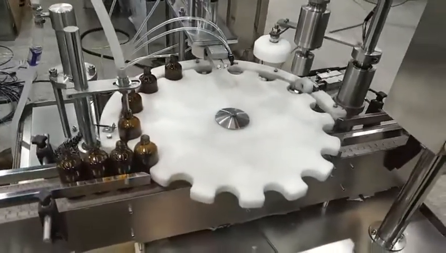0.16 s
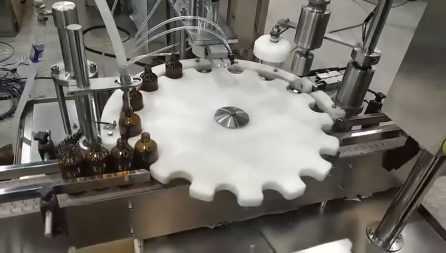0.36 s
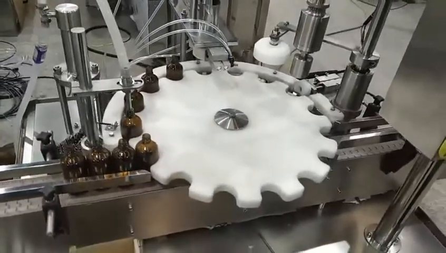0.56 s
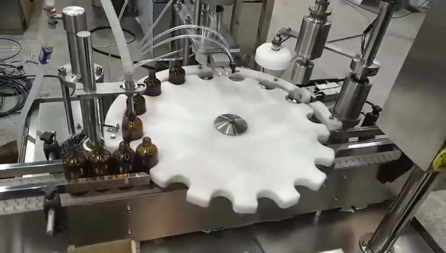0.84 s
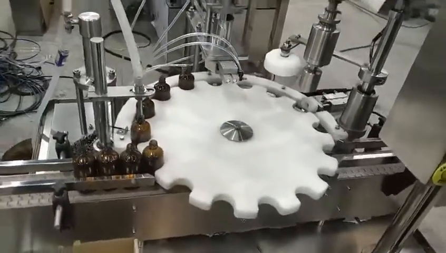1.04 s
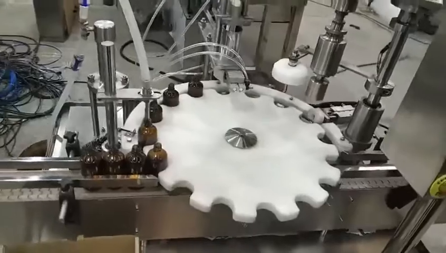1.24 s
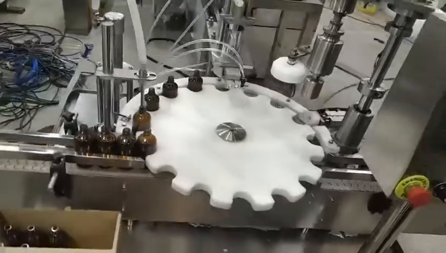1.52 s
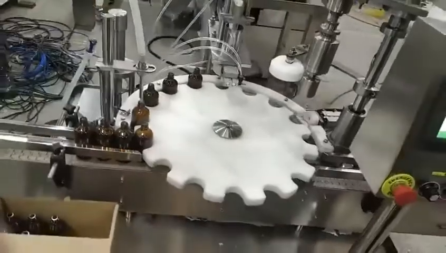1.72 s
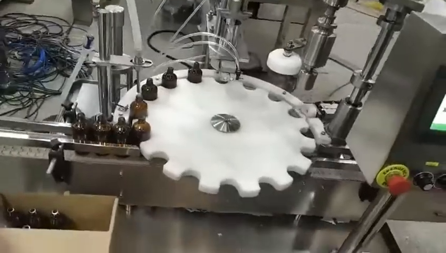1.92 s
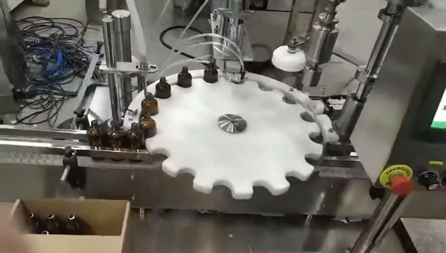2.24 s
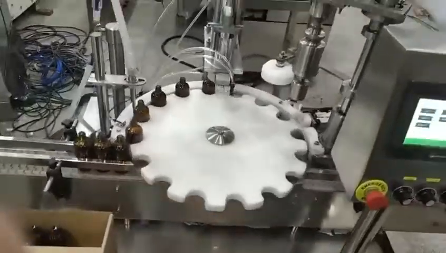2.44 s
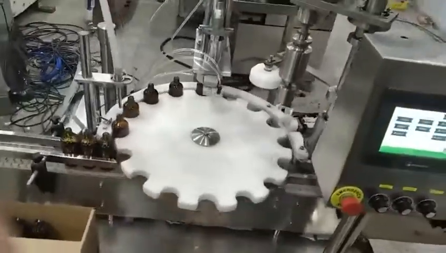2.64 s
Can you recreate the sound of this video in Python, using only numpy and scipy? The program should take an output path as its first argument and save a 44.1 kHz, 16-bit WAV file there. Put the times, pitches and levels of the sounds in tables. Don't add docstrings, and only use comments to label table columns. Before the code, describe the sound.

A bottle filling machine whirs and rattles continuously while air valves puff and glass bottles clink.

```python
import sys
import numpy as np
from scipy import signal
from scipy.fft import rfft, irfft
from scipy.io import wavfile
from scipy.ndimage import uniform_filter1d

SR = 44100
rng = np.random.default_rng(int(sys.argv[2]) if len(sys.argv) > 2 else 0)


def bounce(signal):
    frames = np.transpose(np.atleast_2d(signal))
    limited = np.clip(frames, -1, 1)
    pcm = np.round(limited * 32767).astype(np.int16)
    wavfile.write(sys.argv[1], SR, pcm)


def volts_from_db(level):
    exponent = np.asarray(level, float) / 20
    return 10 ** exponent


N = 122157
T = np.arange(N) / SR


def level(x, db):
    return x * volts_from_db(db) / np.sqrt(np.mean(x ** 2))


def band(x, hz, width_hz):
    return signal.lfilter(*signal.iirpeak(min(hz, .45 * SR), hz / width_hz, fs=SR), x)


def ring(x, hz, t60_s):
    r = np.exp(-np.log(1000) / (t60_s * SR))
    w = 2 * np.pi * hz / SR
    return signal.lfilter([0, np.sin(w)], [1, -2 * r * np.cos(w), r * r], x)


def walk(rate_hz):
    hold = int(SR / rate_hz)
    steps = np.repeat(rng.standard_normal(N // 200), hold)[:N]
    return 1.31 * uniform_filter1d(uniform_filter1d(steps, hold), hold)


def curve(x, table):
    return np.interp(x, *np.array(table).T)


def log_curve(hz, table):
    table_hz, table_db = np.array(table).T
    return np.interp(np.log(hz), np.log(table_hz), table_db)


# [f/Hz, level/dB, t60/s]
GLASS_MODES = [(7120, 5.5, 0.042), (6850, -2, .03), (7190, -8, 0.05), (7380, -9, .015)]
# [f/Hz, level/dB, t60/s]
RAIL_MODES = [(2520, -5, 0.015), (3150, 5, 0.035), (4560, 3, 0.03), (5050, 1, 0.03), (5685, 2, 0.04)]
# [t/s, glass level/dB, rail level/dB]
KNOCKS = [(0.73, -19, -27), (0.757, -28, -34), (.772, -29, -48), (2.1275, -22, -14), (2.1295, -13, -17),
          (2.142, -24, -24), (2.172, -23, -45), (2.188, -21, -35), (2.213, -8, -33), (2.2245, -12, -33.5),
          (2.237, -16, -30), (2.246, -19, -35), (2.253, -16.5, -26), (2.277, -28, -41), (2.286, -21, -39),
          (2.293, -24, -45), (2.763, -19, -25), (2.766, -13.5, -35)]
CONTACT_S = .0009
CRACK_DB, CRACK_S = 8, 0.005


def clinks():
    out, t = np.zeros(N + SR), np.arange(SR // 8) / SR
    contact = 1 - np.exp(-t / CONTACT_S)
    for start_s, glass_db, rail_db in KNOCKS:
        modes = [(hz, db + glass_db, t60) for hz, db, t60 in GLASS_MODES]
        modes += [(hz, db + rail_db - 1.5, t60) for hz, db, t60 in RAIL_MODES]
        knock = 0
        for hz, db, t60_s in modes:
            phase = 2 * np.pi * (hz * t + 0.078 * rng.random())
            knock = knock + volts_from_db(db - 60 * t / t60_s) * np.sin(phase)
        crack = band(rng.standard_normal(len(t)), 5300.0, 3700.0)
        crack = crack * volts_from_db(rail_db + CRACK_DB) * np.exp(-t / CRACK_S)
        out[int(start_s * SR):][:len(t)] += 0.81 * (knock + crack) * contact
    return out[:N]


# [t/s, length/s, level/dB rms, f/Hz, width/Hz]
BURSTS = [(.77, .06, -33, 5100, 900), (1.0, .14, -37, 7300, 1200), (1.181, .014, -25, 4900, 1300),
          (1.205, .014, -24, 5100, 900), (1.222, .04, -26, 5400, 1400), (1.27, .048, -23, 6200, 1200),
          (1.29, .034, -24.5, 7500, 1500), (1.272, .048, -22.5, 4700, 1600), (1.308, .014, -29, 3200, 800),
          (1.32, .015, -25, 5000, 1200), (1.336, .026, -24, 5000, 3000), (1.35, .008, -26, 5200, 900),
          (1.378, .025, -28, 2700, 700), (1.27, .035, -26, 350, 250), (1.55, .07, -31, 210, 70),
          (1.62, .05, -29, 390, 90), (2.25, .25, -28.5, 7800, 3600), (2.26, .07, -28, 5300, 1900),
          (2.36, .2, -33, 2450, 700), (2.72, .05, -30, 1400, 900), (.535, .03, -28, 1420, 200),
          (2.02, .08, -33, 540, 80)]
GRAIN_DB, GRAIN_HZ = 2.0, 150


def puffs():
    out = 0
    for start_s, length_s, db, hz, width_hz in BURSTS:
        swell = np.sin(np.pi * np.clip((T - start_s) / length_s, 0, 1) ** .7)
        noise = band(band(rng.standard_normal(N), hz, width_hz), hz, width_hz)
        noise = noise * volts_from_db(GRAIN_DB * walk(GRAIN_HZ))
        out = out + level(swell * noise, db) * np.sqrt(length_s * SR / N / 2)
    return out


# [order of 50 Hz, level/dB rms, partner motor re first/dB]
HUM_ORDERS = [(3, -45, -10), (4, -46, -10), (5, -37.5, -9), (6, -33, -5), (7, -38, -10), (8, -43, -7),
              (14, -46, -9)]
# [t/s, level/dB]
MOTOR_STRAIN = [(0, 0.5), (.12, 2.5), (.31, -0.5), (.49, -1), (.64, -0.5), (.83, 0), (.93, -1), (1.05, -1),
                (1.2, 1.5), (1.42, 2), (1.54, -5), (1.61, 2.5), (1.72, -5.5), (1.8, 1.5), (2.0, 0),
                (2.2, -3.5), (2.45, -1), (2.77, 1)]
MAINS_HZ = 50.0
SLIP_HZ, BEAT_PEAK_S = 5.3, 1.62
HUM_WOBBLE_DB, HUM_WOBBLE_HZ = 1.4, 14


def motors():
    out = 0
    strain_db = curve(T, MOTOR_STRAIN)
    for order, db, partner_db in HUM_ORDERS:
        turn = 2 * np.pi * (order * MAINS_HZ * T + rng.random())
        slip = 2 * np.pi * SLIP_HZ * order / 6 * (T - BEAT_PEAK_S)
        gain = np.sqrt(2) * volts_from_db(db + strain_db + HUM_WOBBLE_DB * walk(HUM_WOBBLE_HZ))
        out = out + gain * (np.sin(turn) + volts_from_db(partner_db) * np.sin(turn - slip))
    return out


# [f/Hz, width/Hz, level/dB rms]
GEAR_TONES = [(528, 14, -39.5), (701, 16, -41), (899, 8, -41), (935, 12, -46), (1037, 14, -45),
              (1206, 25, -40.5), (1388, 16, -41), (1745, 16, -42), (2500, 350, -34.5), (2902, 20, -46),
              (3280, 100, -43), (4800, 600, -37), (9308, 8, -50)]


def gears():
    return sum(level(band(rng.standard_normal(N), hz, width_hz), db) for hz, width_hz, db in GEAR_TONES)


# [f/Hz, level/dB per Hz]
MACHINE_COLOUR = [(94, -46.5), (160, -10), (301, -7), (403, -11), (720, -13), (1080, -13.5), (1500, -9),
                  (2050, -12), (2600, -11), (5000, -12.5), (7200, -17), (8800, -14), (9600, -14.5),
                  (12400, -80.5)]
FLICKER_DB, FLICKER_HZ, DRIFT_DB, DRIFT_HZ = 1.0, 12, 0.28, 3


def wash():
    out = 0
    for hz in 130 * 2 ** np.arange(0, 6.4, 1 / 3):
        noise = band(band(rng.standard_normal(N), hz, hz / 3), hz, hz / 3)
        db = log_curve(hz, MACHINE_COLOUR) + FLICKER_DB * walk(FLICKER_HZ) + DRIFT_DB * walk(DRIFT_HZ)
        out = out + volts_from_db(db) * noise
    return out


RATTLE_PER_S, RATTLE_SPREAD_DB, RATTLE_T60_S = 2500, 3.0, .09
RATTLE_LO_HZ, RATTLE_HI_HZ, RATTLE_MODES = 515.6, 8920, 90


def rattle():
    out = 0
    detune = 1 + .015 * rng.standard_normal(RATTLE_MODES)
    for hz in np.geomspace(RATTLE_LO_HZ, RATTLE_HI_HZ, RATTLE_MODES) * detune:
        struck = rng.random(N) < RATTLE_PER_S / RATTLE_MODES / SR
        size = np.minimum(rng.exponential(size=N), 2)
        hits = struck * volts_from_db(RATTLE_SPREAD_DB * size)
        grains = ring(hits, hz, RATTLE_T60_S) / np.sin(2 * np.pi * hz / SR)
        out = out + volts_from_db(log_curve(hz, MACHINE_COLOUR)) * np.sqrt(hz) * grains
    return out


# [t/s, level/dB]
MACHINE_LOAD = [(0, -3), (.2, -0.5), (.5, -1.5), (.8, -0.5), (1.1, 0), (1.4, 0), (1.55, -0.5), (1.8, -1.5),
                (2.1, -1), (2.4, -1.5), (2.6, -2), (2.77, -1.5)]
WASH_DB, RATTLE_DB = -21.5, -25


def machinery():
    return (level(wash(), WASH_DB) + level(rattle(), RATTLE_DB)) * volts_from_db(curve(T, MACHINE_LOAD))


ECHO_T60_S, ECHO_DB = .3, -13


def room(near):
    size = SR // 2
    tail = rng.standard_normal(size) * volts_from_db(-60 * np.arange(size) / SR / ECHO_T60_S)
    tail = tail / np.sqrt(np.sum(tail ** 2))
    return signal.fftconvolve(near, tail)[:N] * volts_from_db(ECHO_DB)


def scene():
    near = clinks() + puffs()
    return np.tile(near + room(near) + motors() + gears() + machinery(), (2, 1))


# [t/s, level/dB, release/s]
GAIN_DIPS = [
    (1.25, -2.5, 0.11),
    (2.131, -4.5, 0.096),
    (2.215, -2.5, 0.08),
]
DUCK_ATTACK_S = 0.0033


def duck(x):
    for start_s, db, release_s in GAIN_DIPS:
        t = np.maximum(T - start_s, 0)
        x = x * volts_from_db(db * (1 - np.exp(-t / DUCK_ATTACK_S)) * np.exp(-(t / release_s) ** 2))
    return x


# [f/Hz, level/dB]
ROUNDING_STEP = [(200, -8), (600, 1.5), (2000, 4.3), (5000, 5), (7200, 7), (9000, 6)]
STEP_SPREAD_DB, ROUNDING = 1.4, .36
FRAME, FRAME_START, PATCH = 1024, 880, 32
OUT_DB = -20.5


def quieten(x):
    pad = np.pad(x, (FRAME, 3 * FRAME), mode="reflect")
    count = len(pad) // FRAME - 1
    n = np.arange(2 * FRAME) + .5
    k = np.arange(FRAME // 2) + .5
    where = np.arange(count)[:, None] * FRAME + np.arange(2 * FRAME)
    window = np.sin(np.pi * n / (2 * FRAME))
    basis = window[:, None] * np.cos(np.pi / FRAME * np.outer(n + FRAME / 2, k))
    parts = pad[where] @ basis
    loud = np.sqrt(uniform_filter1d(parts ** 2, size=40))
    loud = np.minimum(loud, np.median(loud, axis=0))
    chance = np.repeat(rng.standard_normal((count, FRAME // 32)), 16, axis=1)
    step_db = log_curve(k * SR / (2 * FRAME), ROUNDING_STEP) + STEP_SPREAD_DB * chance
    step = loud * volts_from_db(step_db)
    kept = np.sign(parts) * step * np.floor(abs(parts) / step + ROUNDING)
    out = np.zeros(len(pad))
    np.add.at(out, where, kept @ basis.T)
    return level(out[FRAME:][:N], OUT_DB)


# [f/Hz, share/0-1]
FILL_SHARE = [(4000, 0), (4500, 0), (6000, .08), (7000, 0.2), (8200, .4), (9000, 0.4), (9600, .05)]
FILL_DB, FILL_CLUSTER, FILL_CLUSTER_HZ = 2.5, .5, 8
TOP_HZ = 9620


def fill(x):
    lead = 2 * FRAME - FRAME_START
    pad = np.pad(x, (lead, 3 * FRAME))
    count = len(pad) // FRAME - 1
    window = np.sin(np.pi * (np.arange(2 * FRAME) + .5) / (2 * FRAME))
    where = np.arange(count)[:, None] * FRAME + np.arange(2 * FRAME)
    spec = rfft(pad[where] * window)[:, :FRAME].reshape(count, -1, PATCH)
    patch_hz = (np.arange(FRAME // PATCH) + .5) * PATCH * SR / (2 * FRAME)
    below_top = np.arange(FRAME) * SR / (2 * FRAME) < TOP_HZ
    cluster = np.exp(FILL_CLUSTER * np.resize(walk(FILL_CLUSTER_HZ)[::FRAME], count))
    share = curve(patch_hz, FILL_SHARE) * cluster[:, None]
    chosen = (rng.random((count, len(patch_hz))) < share)[..., None]
    size = np.sqrt(np.mean(abs(spec) ** 2, axis=2, keepdims=True))
    chosen = chosen & (size < 1.3 * np.median(size, axis=0))
    out = np.zeros((2, len(pad)))
    for ear in out:
        noise = rng.standard_normal(spec.shape) + 1j * rng.standard_normal(spec.shape)
        fresh = size * volts_from_db(FILL_DB) / np.sqrt(2) * noise
        mixed = np.where(chosen, fresh, spec).reshape(count, -1)
        np.add.at(ear, where, irfft(mixed * below_top, 2 * FRAME) * window)
    return out[:, lead:][:, :N]


def low_pass(x):
    return signal.sosfilt(signal.butter(12, 10610, fs=SR, output="sos"), x)


BASS_CUT_HZ, RUMBLE_DB = 142.7, -55


def record(dry):
    bass_cut = signal.butter(6, BASS_CUT_HZ, "high", fs=SR, output="sos")
    x = signal.sosfilt(bass_cut, dry[0])
    x = x + level(band(rng.standard_normal(N), 100.0, 37.0), RUMBLE_DB)
    mix = fill(quieten(duck(x)))
    return low_pass(mix)


dry = scene()
out = record(dry)
bounce(out)
```